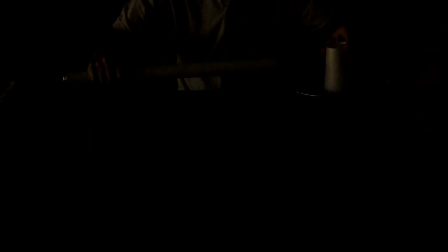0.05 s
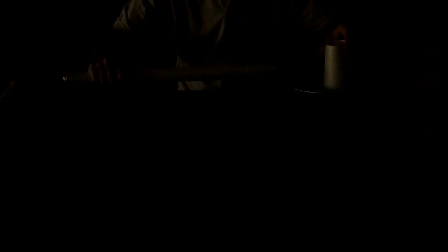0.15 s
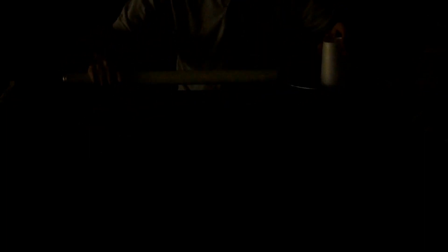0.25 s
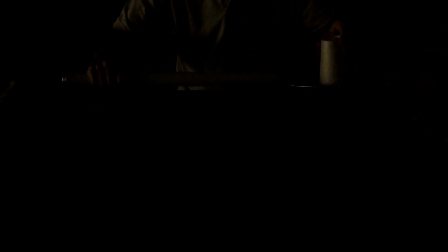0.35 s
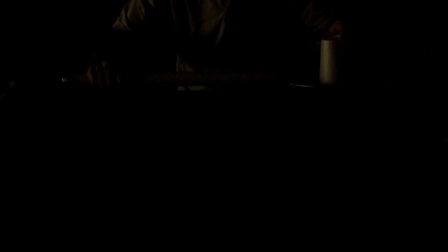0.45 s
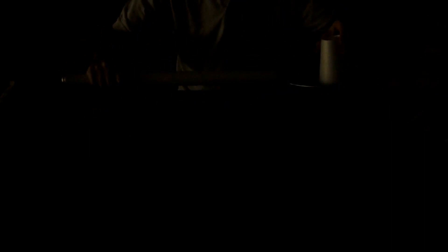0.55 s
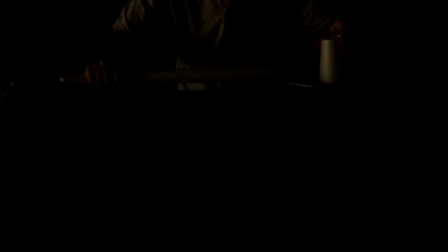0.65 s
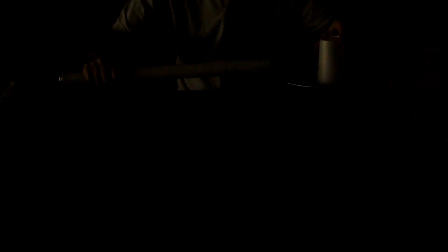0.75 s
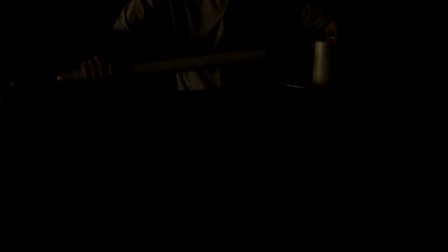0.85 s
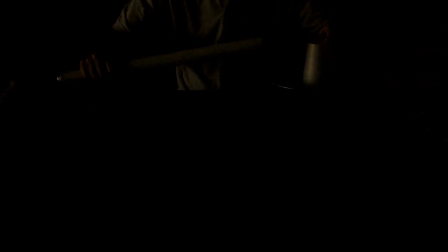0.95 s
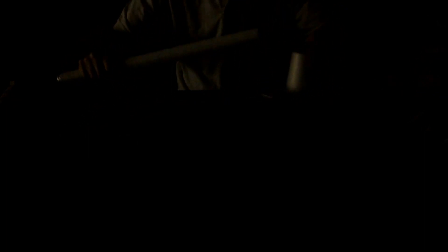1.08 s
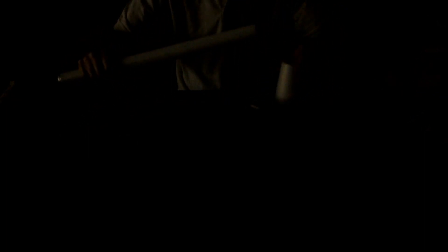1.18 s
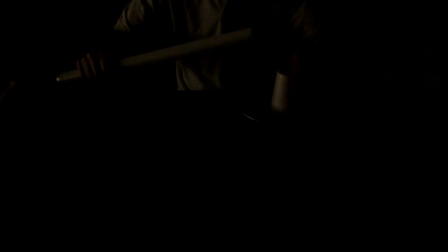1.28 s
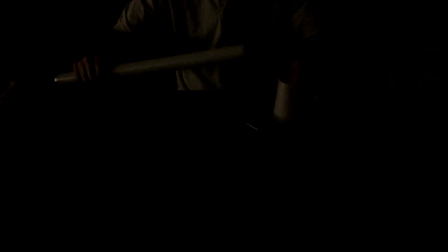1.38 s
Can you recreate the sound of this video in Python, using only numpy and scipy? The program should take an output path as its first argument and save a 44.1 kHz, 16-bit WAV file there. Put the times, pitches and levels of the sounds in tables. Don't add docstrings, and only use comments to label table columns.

```python
import sys
import numpy as np
from scipy import signal
from scipy.fft import rfft, irfft
from scipy.io import wavfile
from scipy.ndimage import uniform_filter1d

SR = 44100
rng = np.random.default_rng(int(sys.argv[2]) if len(sys.argv) > 2 else 0)


def pcm_store(signal):
    levels = np.round(np.clip(np.atleast_2d(signal), -1, 1) * 32767)
    wavfile.write(sys.argv[1], SR, levels.astype(np.int16).T)


def attenuation_scalar(level_db):
    decades = np.asarray(level_db, float) / 20
    return 10 ** decades


N = 61740


def evened(x):
    return x / np.sqrt(np.mean(x ** 2) + 1e-20)


def read(points, hz):
    f, value = np.transpose(points)
    return np.interp(np.log(hz + 1), np.log(f + 1), value)


def add(mix, start_s, sound):
    part = mix[..., round(start_s * SR):][..., :sound.shape[-1]]
    part += sound[..., :part.shape[-1]]


def colour(x, tone):
    level_db = np.maximum(read(tone, abs(np.fft.fftfreq(4096, 1 / SR))), -80)
    log_gain = np.log(attenuation_scalar(level_db))
    response = np.fft.ifft(np.exp(np.conj(signal.hilbert(log_gain)))).real[:2048]
    return signal.fftconvolve(x, response / np.linalg.norm(response))[:len(x)]


def ports(x, lead, pan_db):
    turn = np.exp(1j * np.pi * lead * np.fft.rfftfreq(len(x)))
    left = irfft(rfft(x) * turn, len(x)) * attenuation_scalar(pan_db / 2)
    right = irfft(rfft(x) / turn, len(x)) / attenuation_scalar(pan_db / 2)
    return np.array([left, right])


def pair(z, same):
    same = np.clip(same, 0, 1)
    shared, opposed = np.sqrt((1 + same) / 2), np.sqrt((1 - same) / 2)
    return np.array([shared * z[0] + opposed * z[1], shared * z[0] - opposed * z[1]])


def ring(modes, spread_db, spot_hz):
    spot_db, spot_width, detune = 7, 0.067, 0.006
    t = np.arange(4096) / SR
    out = np.zeros(4096)
    for pitch_hz, level_db, t60_s in modes:
        luck, shift = rng.standard_normal(2)
        favour_db = spot_db * np.exp(-(np.log(pitch_hz / spot_hz) / spot_width) ** 2)
        fade = attenuation_scalar(level_db + spread_db * luck + favour_db - 60 * t / t60_s)
        out += fade * np.sin(2 * np.pi * pitch_hz * (1 + detune * shift) * t)
    return out


def burst(decay_s, tone):
    t = np.arange(4096) / SR
    return colour(rng.standard_normal(4096) * np.exp(-t / max(decay_s, 1e-4)), tone)


# pitch_hz [Hz], level_db [dB]
AIR_TONE = [(20, -19), (55, -8), (90, -21), (125, -3.5), (250, -10), (520, -8.5), (1020, -13.5),
            (14600, -22.5)]
# pitch_hz [Hz], likeness [0 to 1]
AIR_LIKENESS = [(60, 0.98), (180, 0.76), (550, 0.42), (1650, 0.09), (4970, 0.0086), (15000, 0.048)]
# pitch_hz [Hz], left_minus_right_db [dB]
AIR_BALANCE = [(60, 2), (380, 0.5), (2380, 0), (15000, 2)]
# pitch_hz [Hz], level_db [dB], width_hz [Hz]
HUM_LINES = [(118.3, -76.5, 6.7), (184, -81.5, 27), (52, -85, 5.6), (524, -85, 24)]


def air():
    air_db, patch_db, hiss_edge_hz = -61, 1.24, 15600
    frames, hz = N // 512 + 5, np.fft.rfftfreq(2048, 1 / SR)
    a, b, c, d, patches = rng.standard_normal((frames, 1025, 5)).T
    patches = uniform_filter1d(patches, 20, 0)
    patches = evened(uniform_filter1d(patches, 6, 1))
    z = pair([a + 1j * b, c + 1j * d], read(AIR_LIKENESS, hz)[:, None])

    def sounded(spectrum):
        return evened(signal.istft(spectrum, nperseg=2048, noverlap=1536)[1][:, :N])

    side_db = read(AIR_BALANCE, hz)[:, None] / 2 * np.array([1, -1])[:, None, None]
    patchy_db = patch_db * patches * (hz < 1500)[:, None]
    wash = z * attenuation_scalar(read(AIR_TONE, hz)[:, None] + side_db + patchy_db)
    wash = wash / np.sqrt(1 + (hz[:, None] / hiss_edge_hz) ** 70)
    out = attenuation_scalar(air_db) * sounded(wash)
    for pitch_hz, level_db, width_hz in HUM_LINES:
        line = z / (1 + ((hz[:, None] - pitch_hz) / width_hz) ** 4)
        out = out + attenuation_scalar(level_db) * sounded(line)
    return out


# start_s [s], rise_s [s], level_db [dB]
SLEEVE_MOVES = [
    (.72, 0.038, -62),
    (1.235, .03, -67.5),
]
# pitch_hz [Hz], level_db [dB]
CLOTH_TONE = [(120, -13), (170, 5), (350, -8), (600, 5), (1300, -6.5), (2500, -25)]


def rustle():
    out = np.zeros(N)
    for start_s, rise_s, level_db in SLEEVE_MOVES:
        u = np.arange(12000) / SR / rise_s
        cloth = colour(rng.standard_normal(12000), CLOTH_TONE)
        add(out, start_s, attenuation_scalar(level_db) * u * np.exp(1 - u) * cloth)
    return out


# pitch_hz [Hz], t60_s [s to fall 60 dB]
ROOM_FADE = [(150, 1), (600, 0.64), (2000, 0.46), (6000, 0.36), (15000, 0.22)]
# pitch_hz [Hz], likeness [0 to 1]
ROOM_LIKENESS = [(60, 0.99), (180, 1), (550, 0.92), (1650, 1), (4970, 0.32), (15000, 0.61)]


def room(x):
    hits = np.zeros((2, SR // 2))
    slots = np.arange(180, SR // 2 - 20, 20)
    at = slots + rng.integers(0, 20, (2, len(slots)))
    np.put_along_axis(hits, at, rng.choice([-1., 1.], at.shape), 1)
    hz, t, z = signal.stft(hits, SR, nperseg=256)
    z = pair(z, read(ROOM_LIKENESS, hz)[:, None])
    z = z * attenuation_scalar(-60 * t / read(ROOM_FADE, hz)[:, None])
    tail = signal.istft(z, SR, nperseg=256)[1]
    return signal.fftconvolve(x[None], tail / np.linalg.norm(tail[0]), axes=1)[:, :N]


# time_s [s], pitch_hz [Hz], level_db [dB]
PAN_HIGH = [
    [(.266, 1040, -41), (.274, 1041, -30), (.286, 1028, -24), (.304, 1017, -28.5), (.3095, 1016, -40)],
    [(.313, 1009, -33), (.319, 1006, -34), (.324, 1006, -41), (.338, 1031, -59), (.343, 1025, -48)],
    [(.354, 1016, -36), (.366, 1025, -45), (.372, 1027, -54), (.378, 1029, -44.5), (.42, 1020, -51.5)],
    [(.425, 1041, -42.5), (.436, 1038, -38), (.445, 1019, -57.5), (.452, 1028, -42), (.468, 1073, -51),
     (.48, 1091, -64)],
    [(.497, 1030, -69), (.503, 1025, -59), (.515, 1047, -64), (.53, 1029, -70), (.553, 1006, -76),
     (.561, 1004, -62), (.575, 1060, -64), (.62, 1079, -77)],
]
# time_s [s], pitch_hz [Hz], level_db [dB]
PAN_LOW = [
    [(0.29, 638.9, -65), (0.306, 638.6, -63), (0.328, 619.6, -36.5), (0.346, 621, -49),
     (0.374, 617.5, -42.5), (0.4, 618, -63)],
    [(0.4, 612, -59), (0.412, 631.5, -44), (0.424, 602, -57.5), (0.5, 629, -65), (0.552, 601, -67),
     (0.586, 619, -82), (0.6, 617.8, -73)],
]
# start_s [s], pitch_hz [Hz], level_db [dB]
SOFT_THUDS = [
    (.266, 205, -55),
    (0.299, 454.7, -49),
    (0.32, 200.5, -52),
    (0.343, 286, -53.5),
    (0.387, 399, -50.5),
]


def swells():
    waver, thud_rise_s = 0.009, 0.015
    out, t = np.zeros(N), np.arange(N) / SR
    for spans in (PAN_HIGH, PAN_LOW):
        time_s, pitch_hz, level_db = np.transpose(sorted(map(tuple, np.vstack(spans))))
        drift = evened(uniform_filter1d(rng.standard_normal(N), 200))
        hz = np.interp(t, time_s, pitch_hz) * (1 + waver * drift)
        gate = np.clip((t - time_s[0]) / .002, 0, 1) * np.clip((time_s[-1] - t) / .02, 0, 1)
        level = np.sqrt(2) * gate * attenuation_scalar(np.interp(t, time_s, level_db))
        out += level * np.sin(2 * np.pi * np.cumsum(hz) / SR)
    t = t[:6000]
    u = t / thud_rise_s
    for start_s, pitch_hz, level_db in SOFT_THUDS:
        wobble = 25 * uniform_filter1d(rng.standard_normal(6000), 500)
        swell = attenuation_scalar(level_db) * np.sqrt(2) * (u * np.exp(1 - u)) ** 2
        add(out, start_s, swell * np.sin(2 * np.pi * pitch_hz * t + wobble))
    return out


# start_s [s], glass_crack_db [dB], pan_clank_db [dB], contact_decay_s [s], favoured_pitch_hz [Hz]
TAPS = [(.2670, -32.5, -32.5, 0.0057, 1480), (0.2715, -33, -28.5, 0.0051, 2570),
        (0.2744, -41, -31, 0.0053, 3250), (.281, -38, -32, 0.0078, 2530), (.2898, -29.5, -31.5, .006, 2030),
        (0.2954, -32.5, -31.5, .005, 2100), (.302, -38.5, -30, 0.0052, 2360),
        (.310, -40.5, -35, 0.011, 2600), (.3199, -26, -33, 0.0022, 2520), (.3240, -24.5, -30, .0044, 2040),
        (.3294, -27, -30, .005, 2450), (.337, -29.5, -33.5, 0.0056, 2520), (.348, -36, -36.5, 0.0038, 2500),
        (.353, -41, -39, 0.0056, 3100), (.360, -44, -41.5, 0.0064, 1990), (.3797, -54, -40.5, 0.0022, 2050),
        (.388, -50, -43.5, .0085, 2050), (.410, -47, -41, 0.0065, 2500), (.4246, -38, -39, 0.0026, 2350),
        (.4280, -39, -40.5, 0.0096, 2350), (.436, -49, -45, .004, 3180), (.450, -52, -47, 0.007, 2280),
        (.466, -65, -50, .008, 2050), (.479, -63, -53, 0.0087, 2050), (.500, -70, -56, 0.013, 2200),
        (.538, -56.5, -57, 0.022, 1980), (.553, -57, -53.5, .012, 2120), (.568, -58.5, -56.5, 0.013, 2460),
        (.580, -61, -56, 0.015, 2050), (.691, -60.5, -63, .012, 3300), (.186, -64.5, -86, 0.056, 2000)]
# pitch_hz [Hz], level_db [dB]
CRACK_TONE = [(2060, -20), (3700, -4.5), (4690, -1), (6040, -3), (8790, 4), (12300, 2), (14000, 3.5),
              (16100, -14), (16500, -37)]
# pitch_hz [Hz], level_db [dB]
CLANK_TONE = [(120, -52.5), (400, -15), (850, -5), (1500, -8), (2300, -1.5), (3200, -1.5), (4200, -8),
              (7000, -18.5), (12000, -67)]
# pitch_hz [Hz], level_db [dB], t60_s [s to fall 60 dB]
GLASS_MODES = [(4612, 7.5, .035), (4820, 0, .03), (4950, -5, .03), (7500, -5, .02), (8900, 3, .02),
               (11800, -1, 0.017)]
# pitch_hz [Hz], level_db [dB], t60_s [s to fall 60 dB]
PAN_MODES = [(1280, -3.5, 0.047), (1390, -3.5, 0.033), (1616, -3, 0.02), (1836, -10, 0.023),
             (1963, -4.5, 0.047), (2059, -3, 0.043), (2200, -6, 0.029), (2350, -5, .035), (2440, -7, .03),
             (2520, -2.5, 0.048), (2650, -5.5, 0.034), (2870, -8, 0.025), (3064, -5, 0.028),
             (3300, -3, .025)]


def taps():
    glass_modes_db, pan_modes_db, clank_trim_db = -39, -38.5, -0.3
    knock_s, knock_db, knock_hz, knock_t60_s = .2669, -22, 1300, .014
    out, t = np.zeros(N), np.arange(2048) / SR
    knock_level = attenuation_scalar(knock_db - 60 * t / knock_t60_s) * np.minimum(t / .001, 1) ** 2
    add(out, knock_s, knock_level * np.sin(2 * np.pi * knock_hz * t))
    for start_s, crack_db, clank_db, decay_s, spot_hz in TAPS:
        crack, clank = burst(decay_s, CRACK_TONE), burst(decay_s, CLANK_TONE)
        glass_ring = signal.fftconvolve(crack, ring(GLASS_MODES, 2.0, spot_hz))[:4096]
        pan_ring = signal.fftconvolve(clank, ring(PAN_MODES, 2.1, spot_hz))[:4096]
        add(out, start_s, attenuation_scalar(crack_db) * (crack + attenuation_scalar(glass_modes_db) * glass_ring))
        add(out, start_s, attenuation_scalar(clank_db + clank_trim_db) * (clank + attenuation_scalar(pan_modes_db) * pan_ring))
    return out


# start_s [s], level_db [dB], fizz_s [s], left_minus_right_db [dB], change_of_lows_db [dB]
SPARKS = [
    (.2338, -17.5, 0.00083, 10, 0.5),
    (0.235, -32, 0.0015, 3, -3),
    (.2384, -17.5, 0.0014, -11, -7.5),
    (0.239, -25, .003, -3, -6),
    (.2470, -36, .003, 1, -5),
    (0.2485, -28, .002, 0, -2),
    (0.251, -38, 0.0071, 1, -4),
    (0.256, -36, 0.0032, 1, -9),
]
# pitch_hz [Hz], level_db [dB]
SPARK_TONE = [(250, -18), (1500, -17), (3200, -16.5), (4600, -6), (7000, -3), (10000, -2), (13000, 1),
              (16300, -16)]


def sparks():
    snap_gain, fizz_gain, snap_s, pan_echo, lows_below_hz = 1.5, 0.3, 0.001, 0.75, 10500
    out, tick = np.zeros((2, N)), np.zeros(4096)
    tick[32] = -1
    tick[51] = -pan_echo
    for start_s, level_db, fizz_s, pan_db, lows_db in SPARKS:
        tone = [(hz, db + lows_db * (hz < lows_below_hz)) for hz, db in SPARK_TONE]
        snap = snap_gain * colour(tick, tone) * min(snap_s / fizz_s, 1)
        fizz = fizz_gain * np.roll(burst(fizz_s, tone), 32)[:len(snap)]
        both = ports(snap, 0.34, pan_db) + ports(fizz, 0.64, -pan_db / 4)
        add(out, start_s - 32 / SR, attenuation_scalar(level_db) * both)
    return out


def scene():
    snaps, hits, rings = sparks(), taps(), swells()
    wet = room(attenuation_scalar(-10) * snaps.mean(0) + attenuation_scalar(-8.5) * hits + attenuation_scalar(-19) * rings)
    near = ports(hits + rings + rustle(), lead=0.75, pan_db=0.46)
    return snaps + near + wet + air()


def roll_off(x):
    return signal.sosfilt(signal.butter(12, 16810, fs=SR, output="sos"), x)


def record(dry):
    edge = signal.firwin(255, 16600, window=("kaiser", 8), fs=SR)
    mix = signal.oaconvolve(dry, edge[None], "same")
    return roll_off(mix)


dry = scene()
out = record(dry)
pcm_store(out)
```